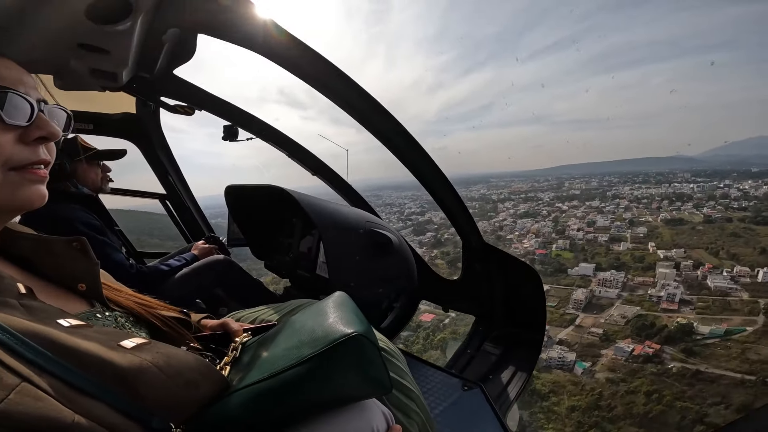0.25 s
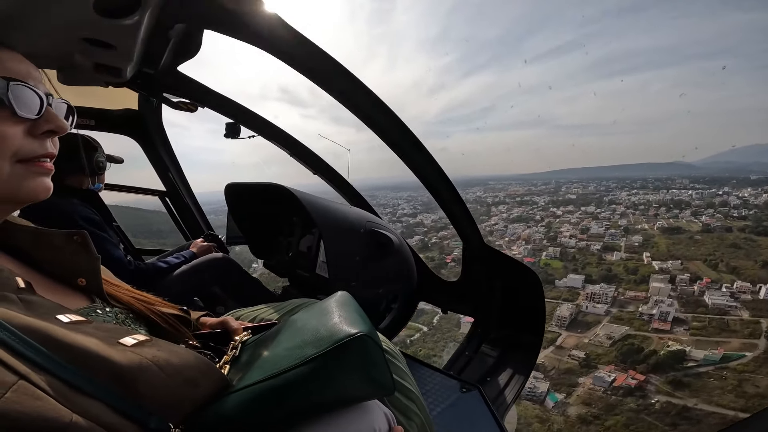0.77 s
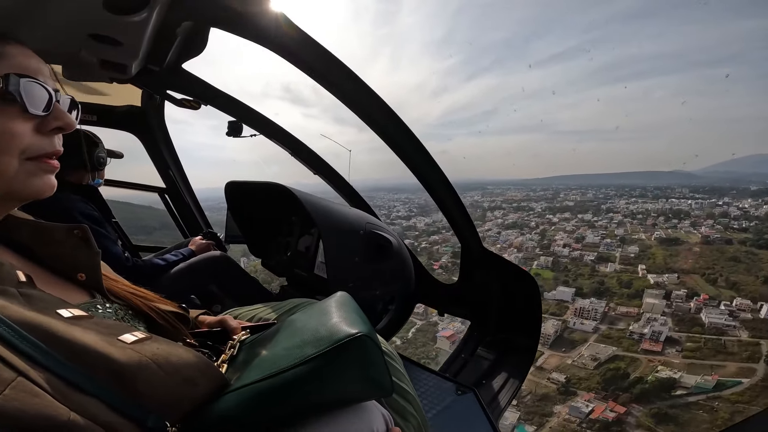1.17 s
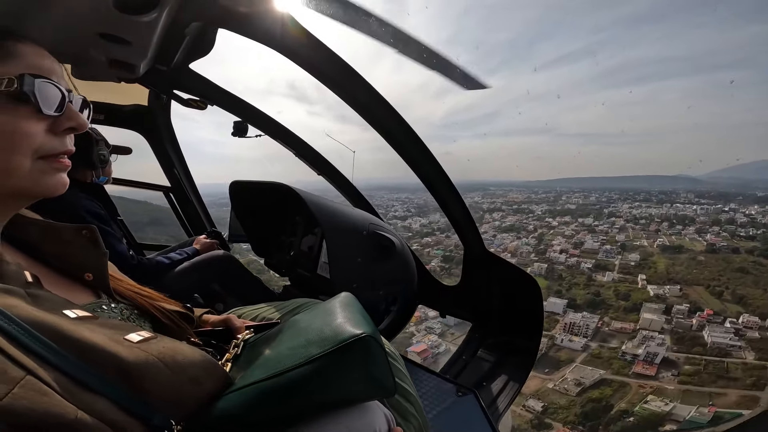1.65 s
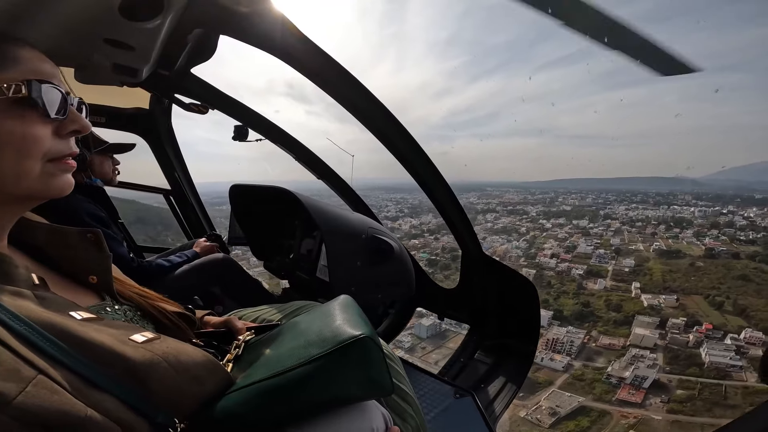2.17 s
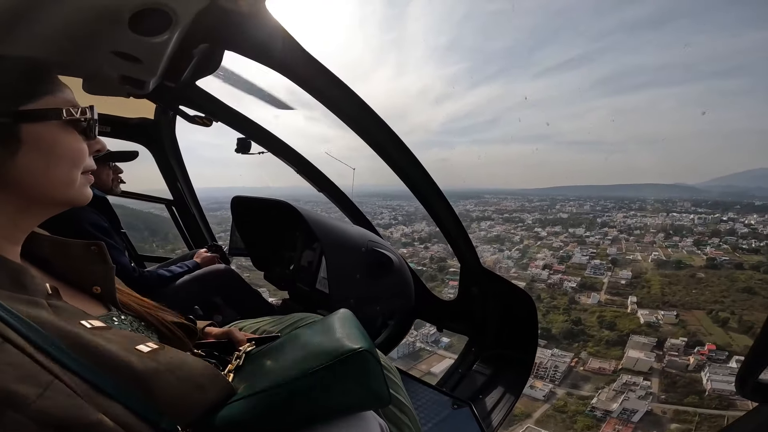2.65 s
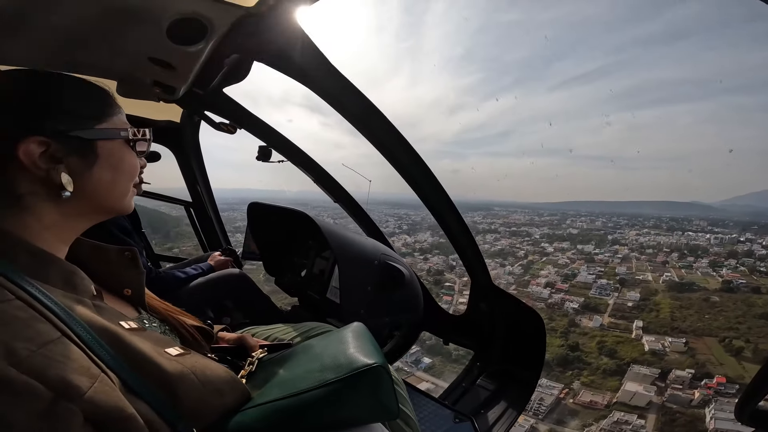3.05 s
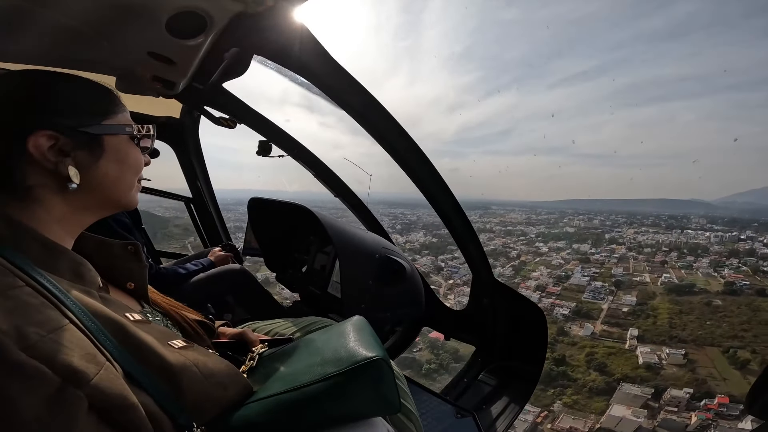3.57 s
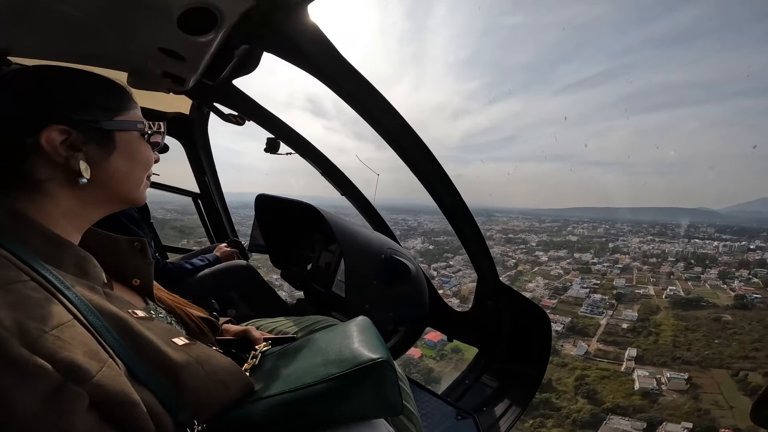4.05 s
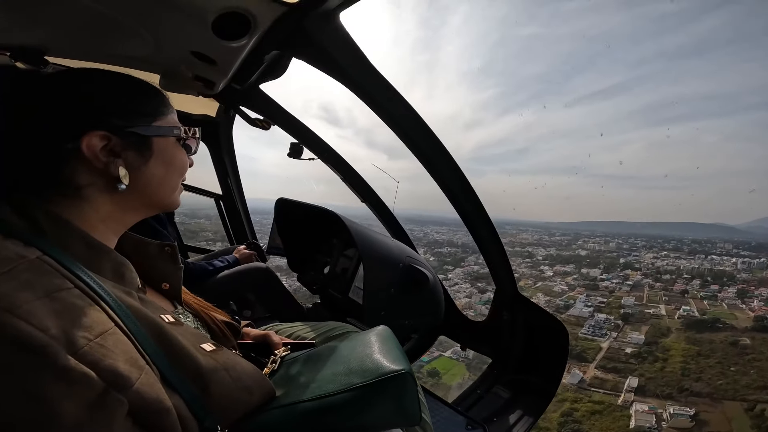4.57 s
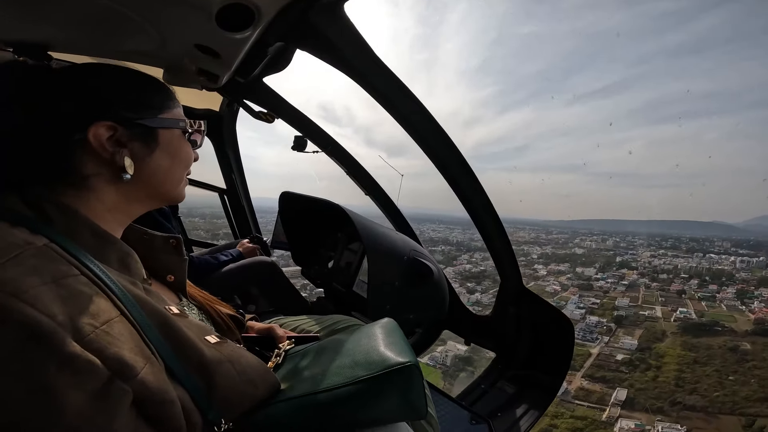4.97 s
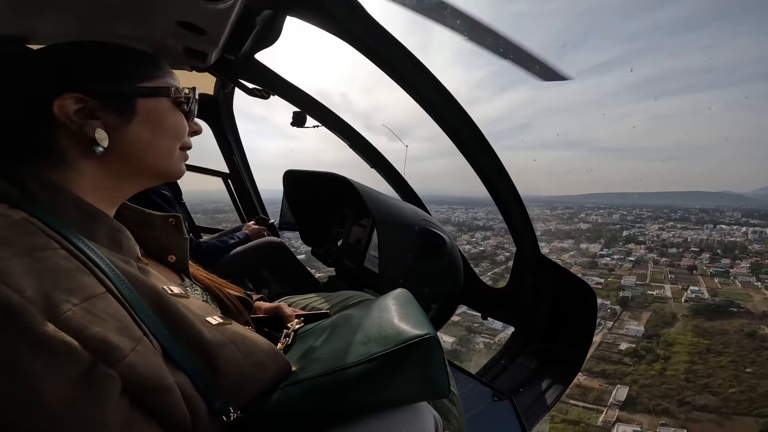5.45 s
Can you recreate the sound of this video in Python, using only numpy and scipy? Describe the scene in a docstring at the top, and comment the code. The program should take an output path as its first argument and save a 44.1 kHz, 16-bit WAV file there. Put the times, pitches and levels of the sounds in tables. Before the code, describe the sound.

From 0 to about 5.7 seconds, a helicopter cabin in steady flight, with no start or stop. The base is a heavy, low blade throb at roughly twenty passes a second, too quick to count, more flutter than separate chops. A low shaft hum around 100 hertz comes and goes, swelling near 1.4, 3, 4 and 4.5 seconds. Deep turbulent rumble and a broad, dull wind roar fill the space, with canopy panels adding wavering hollow resonance and gears a barely audible whine. Very faint high seal hiss grows slightly whistly around 3.5 seconds. Tiny dry ticks of loose trim rattle irregularly at left, busiest from 0 to 3.6 seconds, then fainter. From about 3 seconds the roar is slightly brighter; after 4.5, and especially at the very end, the throb turns deeper. Close small stereo microphone, gently limited, no echo, dull top end.

```python
"""A helicopter cabin in flight: blade passes thump the hull as a stack of sine orders, under the steady
hum of the drive shaft and gears. Shaped stereo noise makes the slipstream's rumble, roar and hiss, and
narrow bands of noise ring as canopy panels. Loose trim ticks in short decaying sines, mostly at left.
A small camera with two close microphone ports holds the peaks down with a soft limiter."""
import sys
import numpy as np
from scipy import signal
from scipy.fft import rfft, irfft, dct, next_fast_len
from scipy.io import wavfile
from scipy.ndimage import uniform_filter1d, minimum_filter1d, map_coordinates

SR = 44100
rng = np.random.default_rng(int(sys.argv[2]) if len(sys.argv) > 2 else 0)


def file_out(sig):
    """Save sig as 16-bit WAV at sys.argv[1]."""
    # one column per channel
    cols = np.atleast_2d(sig).T
    # limit, then scale
    lim = np.clip(cols, -1, 1)
    pcm = np.round(lim * 32767).astype(np.int16)
    wavfile.write(sys.argv[1], SR, pcm)


N = 251811  # length in samples


def amp(db):
    """Decibels to linear gain."""
    return 10 ** (np.asarray(db) / 20)


def unit(x):
    """Scale to an rms of 1."""
    return x / np.sqrt(np.mean(x ** 2) + 1e-20)


def along(points, hz):
    """Read a (frequency, value) curve with straight lines on a log frequency axis."""
    point_hz, value = np.transpose(points)
    return np.interp(np.log(hz + 1), np.log(point_hz + 1), value)


def curve(points):
    """Draw a (time, value) automation curve, one value per sample."""
    point_s, value = np.transpose(points)
    return np.interp(np.arange(N) / SR, point_s, value)


def wobble(rate_hz):
    """A smooth random curve around zero with rate_hz knots a second."""
    knots = rng.standard_normal(int(N * rate_hz / SR) + 4)
    return map_coordinates(knots, [np.arange(N) * rate_hz / SR])


def filtered(x, response):
    """Filter x by a complex response of frequency, with padding so the end does not wrap round."""
    padded = next_fast_len(N + SR // 2)
    spectrum = rfft(x, padded) * response(np.fft.rfftfreq(padded, 1 / SR))
    return irfft(spectrum, padded)[..., :N]


def tone(cycles, db):
    """A sine at the given rms level, its phase counted in cycles."""
    return np.sqrt(2) * amp(db) * np.cos(2 * np.pi * cycles)


# How the balance of the blade thump shifts, most of all near the end: start_s, share (0-1)
DEEPEN = [(0, 0.06), (2.5, 0), (4.5, 0.42), (5.0, 0.26), (5.5, 0.5), (5.71, 1.05)]
BLADE_HZ, SPEED_UP_HZ = 19.695, .09  # blade passes a second; passes a second added per unit of deepening


def blade_angle():
    """Count blade passes in cycles: a nearly steady rate with a slight random drift in phase."""
    passes = np.cumsum(BLADE_HZ + SPEED_UP_HZ * curve(DEEPEN)) / SR
    return passes - .335 + .006 * wobble(1.5)


# How far the camera has swung from the side window toward the nose: start_s, share (0-1)
SWING = [(0, 0.65), (1.5, 0.36), (2.5, 0.14), (3.5, 1), (5.71, 1)]
# Harmonics of the blade pass as the hull answers them: order (multiple of the blade rate), level_db,
# swing_db (added with the swing), deepen_db (added with the deepening), skew_cycles (phase of the answer)
BLADE_ORDERS = [(1, -26.3, -.7, 5, .55), (2, -16, 0, -6, .55), (3, -34.5, 3, 3.5, .5),
                (4, -37, -3, -8, .12), (5, -46, 8, -6, .45), (6, -42, 0, -6, .2)]


def blades(angle):
    """Each blade pass thumps the hull: phase-locked sine orders with small random level changes."""
    swing, deepen = curve(SWING), curve(DEEPEN)
    thump = np.zeros(N)
    for order, level_db, swing_db, deepen_db, skew_cycles in BLADE_ORDERS:
        order_db = level_db + swing_db * swing + deepen_db * deepen + .3 * wobble(5)
        thump += tone(order * angle + skew_cycles, order_db)
    return thump


# The hum of the drive shaft coming and going: start_s, level_db
SHAFT_LEVEL = [(0, -35), (.45, -28), (1.45, -25.5), (1.85, -35), (2.25, -26), (2.6, -32), (3.0, -23.5),
               (3.6, -25), (4.05, -22), (4.3, -29.5), (4.55, -21.5), (5.0, -29), (5.71, -28.5)]
SHAFT_HZ = 102.12  # turns a second


def drive_shaft():
    """The shaft hums once per turn, beating slowly against the fifth blade order."""
    turns = SHAFT_HZ * np.arange(N) / SR - .12 + .02 * wobble(2.5)
    return tone(turns, curve(SHAFT_LEVEL) + .4 * wobble(5))


# Gear mesh tones: pitch_hz, level_db
GEARS = [(656.7, -53), (1313.2, -57), (3283.5, -66), (4241.6, -70)]


def gears():
    """Meshing gear teeth sing as steady sines whose phases wander."""
    t = np.arange(N) / SR
    return sum(tone(pitch_hz * t + 0.22 * wobble(2.58), level_db) for pitch_hz, level_db in GEARS)


# How alike the air noise is at the two ports: pitch_hz, likeness (0-1)
ALIKE = [(60, 0.99), (130, 1.0), (280, 0.99), (600, 0.78), (1300, 0.9), (2800, 0.64), (6040, 0.78),
         (13000, 0.53)]
# Phase by which the left port leads the right: pitch_hz, lead_rad
LEAD = [(20, 0), (100, 0.045), (250, -0.065), (690, 0.14), (1210, -0.54), (3010, -0.5), (5430, 0.34),
        (11000, -0.049), (11900, 0.3), (13200, -0.0)]
# Left level minus right level: pitch_hz, lean_db
LEAN = [(200, 0), (1500, .5), (4500, 0), (7500, 2), (11000, 1), (14000, 4)]


def rush(gain, patchy_db):
    """Turbulent air at the two ports: shaped stereo noise with random patches, mono sum at rms 1."""
    noise = signal.stft(rng.standard_normal((2, N)), nperseg=1024)[2]
    patches = rng.standard_normal(noise.shape[1:])
    patches = uniform_filter1d(patches, size=8, axis=0)  # smooth over frequency
    patches = uniform_filter1d(patches, size=8, axis=1)  # smooth over time
    pair = signal.istft(noise * amp(patchy_db * unit(patches)), nperseg=1024)[1][:, :N]

    def spread(hz):
        turn = np.arccos(np.clip(along(ALIKE, hz), -1, 1)) / 2
        return gain(hz) * [np.cos(turn), np.sin(turn)]

    mid, side = filtered(pair, spread)
    ports = np.array([[.5], [-.5]])  # half of each left-right difference goes to each port
    both = filtered(np.array([mid + side, mid - side]),
                    lambda hz: amp(ports * along(LEAN, hz)) * np.exp(1j * ports * along(LEAD, hz)))
    return both / np.std(both.mean(axis=0))


def blade_wash(angle):
    """Each blade pass presses the air against the canopy: one smooth swell per pass, from -1 to 1."""
    return np.cos(2 * np.pi * angle)


# Tilt of the roar's spectrum before the cabin colours it: pitch_hz, level_db (relative, per Hz)
ROAR = [(150, -120), (250, -23), (400, 0), (500, 0), (640, -2.5), (850, -5), (1100, -4), (1300, -6),
        (1700, -7), (1800, -10.5), (2000, -12.5), (2500, -14), (5000, -21.5), (7500, -31.5), (8100, -37),
        (12000, -58)]
# Bands where the cabin lifts or dims the roar: pitch_hz, width_hz, gain_db
CABIN = [(840, 36, -2.5), (1770, 95, -0.5), (2066, 40, 0.5), (2510, 230, -2), (2570, 38, 1), (2660, 37, 0),
         (4370, 60, -2.5), (4400, 60, 2.5), (4880, 120, 1.5)]
# Bands of the roar that rise as the camera faces the nose: pitch_hz, width_hz, gain_db
NOSE = [(1530, 36, 3), (2574, 41, 4.5), (2746, 54, 3), (3520, 110, 2)]
# Fader ride of the roar: start_s, level_db
ROAR_LEVEL = [(0, -31.5), (.6, -31.5), (2.1, -33), (3.3, -31.5), (4.6, -31.5), (5.71, -30.5)]


def bumps_db(hz, bands):
    """Sum bell-shaped boosts and cuts in decibels."""
    return sum(gain_db * np.exp(-((hz - pitch_hz) / width_hz) ** 2) for pitch_hz, width_hz, gain_db in bands)


def roar(angle):
    """Slipstream over the canopy: cabin-coloured noise, brighter in a few bands toward the nose."""
    swing = curve(SWING)
    side_view = rush(lambda hz: amp(along(ROAR, hz) + bumps_db(hz, CABIN)), patchy_db=0.5)
    nose_view = filtered(side_view, lambda hz: amp(bumps_db(hz, NOSE)))
    level_db = curve(ROAR_LEVEL) + 0.29 * blade_wash(angle) + 0.36 * wobble(3.66)
    return amp(level_db) * ((1 - swing) * side_view + swing * nose_view)


# Spectrum of the rumble: pitch_hz, level_db (relative, per Hz)
RUMBLE = [(4, -21), (14, -22), (40, -2.5), (52, 1), (60, 0), (70, -5), (78, -1.5), (90, 0.5), (102, -1),
          (112, 1.5), (135, -1.5), (180, -2), (205, -2.5), (228, -5.5), (245, -2), (272, -8), (292, -5),
          (330, -8), (480, -17), (700, -50), (1500, -120)]
# Fader ride of the rumble: start_s, level_db
RUMBLE_LEVEL = [(0, -21), (.7, -23), (1.8, -23.5), (2.2, -21.5), (2.8, -23), (3.3, -20.5), (3.8, -22),
                (4.6, -21.5), (5.71, -20)]


def rumble(angle):
    """Low turbulence over the hull: deep noise pulsing very slightly with the blades."""
    level_db = curve(RUMBLE_LEVEL) + 0.091 * blade_wash(angle)
    return amp(level_db) * rush(lambda hz: amp(along(RUMBLE, hz)), patchy_db=0.33)


# Canopy resonances: pitch_hz, width_hz (to either side), level_db, shift_db (added as the ringing shifts)
PANELS = [(157, 8.5, -39, 2.5), (184.3, 10, -37.5, 2), (240.2, 6.4, -37, -1), (254.1, 7, -38, 2.5),
          (291.7, 8, -44, 2), (917, 21, -46, 0.5), (979, 58, -45, 2.5), (1430, 45, -50.5, 7.5),
          (1478, 25, -48, -7.5), (1524, 23, -56, 3), (1588, 29, -43, -9.5), (1632, 40, -52, -2.5)]
# How the ringing moves from the upper panels to the lower ones: start_s, share (0-1)
SHIFT = [(0, 0.2), (1.3, .2), (2.0, 0.7), (2.7, 1), (4.3, 0.82), (5.71, 1)]
WAVER_DB = 2.1  # depth of each panel's random swelling and fading


def panels():
    """One turbulent push rings every canopy panel: the same noise through many narrow resonances."""
    push = rush(lambda hz: (hz > 100) * (hz < 2400), patchy_db=1.35)
    shift = curve(SHIFT)
    ringing = np.zeros((2, N))
    for k, (pitch_hz, width_hz, level_db, shift_db) in enumerate(PANELS):
        # neighbours ring a quarter cycle apart
        ring = filtered(push, lambda hz: 1j ** k / (1 + ((hz - pitch_hz) / width_hz) ** 2))
        panel_db = level_db + shift_db * shift + WAVER_DB * wobble(1.965)
        ringing += amp(panel_db) * ring / np.std(ring.mean(axis=0))
    return ringing


# Spectrum of the air at the seals: pitch_hz, level_db (relative, per Hz)
HISS = [(5000, -80), (8000, -0.5), (9600, 3), (10700, 5), (12000, 6), (12700, 2), (13800, -7), (15000, -14),
        (15700, -26)]
# Fader ride of the hiss: start_s, level_db
HISS_LEVEL = [(0, -63), (1.0, -63.5), (2.5, -64.5), (3.5, -62), (4.0, -63.5), (5.4, -63), (5.71, -62.5)]
# A narrow whistling band over the hiss: start_s, level_db (relative to the hiss)
WHISTLE_LEVEL = [(0, -14), (2.8, -16), (3.2, -9), (3.55, -7), (3.9, -10), (4.3, -14), (5.71, -12)]
WHISTLE_HZ, WHISTLE_WIDTH_HZ = 10730, 550


def hiss(angle):
    """Air at the seals: high noise with a narrow band of itself laid back on top as a whistle."""
    leak = rush(lambda hz: amp(along(HISS, hz)), patchy_db=.8)
    whistle = unit(filtered(leak, lambda hz: np.exp(-((hz - WHISTLE_HZ) / WHISTLE_WIDTH_HZ) ** 2)))
    level_db = curve(HISS_LEVEL) + 0.76 * blade_wash(angle)
    return amp(level_db) * (leak + amp(curve(WHISTLE_LEVEL)) * whistle)


CHATTER_DB, CHATTER_HZ, CHATTER_SPREAD_HZ = -61.5, 11950, 220  # faint knocks: mean level, pitch, scatter
SETTLE_S, SETTLE_LEN_S, SETTLE_DB = 3.9, .4, 1  # when, over how long and how far the chatter drops


def chatter(angle):
    """Shaking knocks the trim around two moments per blade pass: rows of start_s, level_db, pitch_hz."""
    beats = np.flatnonzero(np.diff(np.floor(2 * angle - .75)) > 0) / SR
    knock_s = np.repeat(beats, repeats=3)
    chance = rng.standard_normal((len(knock_s), 3))
    bouts_db = 2.5 * wobble(6)[(knock_s * SR).astype(int)]  # the chatter comes in bouts
    settled = np.clip((knock_s - SETTLE_S) / SETTLE_LEN_S, 0, 1)
    level_db = CHATTER_DB - SETTLE_DB * settled + bouts_db + 1.8 * chance[:, 1]
    pitch_hz = CHATTER_HZ + CHATTER_SPREAD_HZ * chance[:, 2]
    return np.column_stack([knock_s + .004 * chance[:, 0], level_db, pitch_hz])


# The loudest trim ticks: start_s, level_db (peak, before the port gains), pitch_hz
TICKS = [(0.0682, -57, 11600), (0.1196, -47, 12000), (0.1491, -52, 12000), (0.171, -55, 12000),
         (0.2638, -52, 12000), (0.27, -51, 12100), (0.2765, -50, 12000), (0.3235, -50, 12000),
         (0.524, -53, 12000), (0.3197, -55, 12000), (0.5776, -50, 12300), (0.629, -52, 12000),
         (0.7033, -54, 12000), (0.8076, -51, 12100), (0.836, -54, 11600), (0.8879, -56, 11200),
         (0.9567, -56, 11200), (0.9862, -47, 11700), (1.0091, -50.5, 11900), (1.034, -49, 12000),
         (1.0844, -50, 12000), (1.089, -51, 11500), (1.117, -54, 11900), (1.1395, -53, 11900),
         (1.166, -55, 12000), (1.1353, -59, 11700), (1.1907, -50, 12000), (1.2106, -51, 11800),
         (1.2825, -52, 11300), (1.3364, -51, 11900), (1.3643, -53, 11900), (1.4386, -47, 12000),
         (1.5319, -51, 11300), (1.5953, -47, 11500), (1.6417, -46, 11900), (1.6631, -56, 11600),
         (1.72, -57, 11300), (1.7908, -48, 11700), (1.8766, -55, 11100), (1.9011, -55, 12000),
         (1.9475, -49, 11800), (2.0004, -48, 12000), (2.0522, -53, 11100), (2.2243, -57, 11200),
         (2.2543, -51, 11800), (2.2962, -53, 11500), (2.3236, -53, 11600), (2.4024, -55, 11200),
         (2.4269, -56, 11100), (2.4558, -52, 11500), (2.5102, -50, 11400), (2.5576, -49, 11800),
         (2.5805, -51, 11400), (2.7571, -54, 11700), (2.788, -51, 12100), (2.8325, -53, 11400),
         (2.8639, -50, 11500), (2.9138, -52, 11900), (2.9622, -48, 11900), (2.9846, -52, 11800),
         (3.017, -53, 12000), (3.037, -54, 12000), (3.0634, -50, 11900), (3.1163, -49, 11700),
         (3.1378, -49, 11800), (3.1637, -47, 11600), (3.2879, -51, 11800), (3.3174, -51, 11600),
         (3.266, -55, 12100), (3.369, -53, 12000), (3.496, -53, 11900), (3.5748, -50, 11700),
         (3.6217, -51, 11600)]
# Ringing modes of one piece of trim: ratio (to the tick's pitch), level_db, t60_s
TRIM_MODES = [(.955, -8, .016), (1, 0, .02), (1.035, -6, .012)]


def trim(angle):
    """Loose trim ticks: each blow rings three fast-decaying modes, louder at the left port."""
    ticking = np.zeros(N + SR)
    t = np.arange(SR // 40) / SR
    ratio, mode_db, t60_s = np.transpose(TRIM_MODES)[..., None]
    for start_s, level_db, pitch_hz in [*chatter(angle), *TICKS]:
        blow_db = 3 * rng.standard_normal(ratio.shape)  # each blow lands elsewhere
        phase = rng.random(ratio.shape)
        decay = amp(mode_db + blow_db - 60 * t / t60_s)
        ring = np.sum(decay * np.sin(2 * np.pi * (pitch_hz * ratio * t + phase)), axis=0)
        ring = ring * (1 - np.exp(-t / 0.00058))  # soften the attack
        start = max(round(start_s * SR), 0)
        ticking[start:][:len(t)] += amp(level_db) * ring / np.abs(ring).max()
    return ticking[:N] * amp([[4.1], [-6]])  # left and right port gains in dB


def scene():
    """Mix the cabin: drive tones equal at both ports, stereo air, and trim toward the left."""
    angle = blade_angle()
    drive = blades(angle) + drive_shaft() + gears()
    slipstream = roar(angle) + rumble(angle) + panels() + hiss(angle)
    return drive + slipstream + trim(angle)


GAIN_DB, CEILING, KNEE = 0.5, 0.53, 3.7  # input gain; limiter ceiling and how abruptly it bites
TOP_HZ = 15700  # band limit


def record(dry):
    """A fast soft limiter ducks both channels together on loud swings; a band limit cuts the top."""
    loud = amp(GAIN_DB) * dry
    span = SR // 200  # 5 ms
    need = (1 + (np.abs(loud).max(axis=0) / CEILING) ** KNEE) ** (-1 / KNEE)
    gain = uniform_filter1d(minimum_filter1d(need, size=span), size=span)
    offset = .002  # the converter sits slightly above zero
    kept = np.arange(N) * SR / 2 / N < TOP_HZ
    spectrum = dct(loud * gain + offset, norm='ortho')
    return dct(kept * spectrum, type=3, norm='ortho')


dry = scene()
out = record(dry)
file_out(out)
```